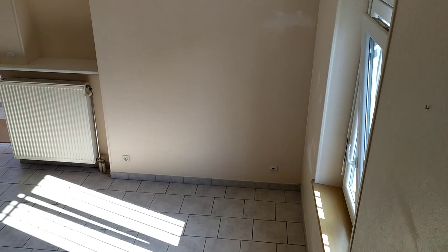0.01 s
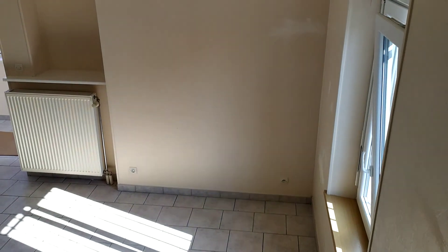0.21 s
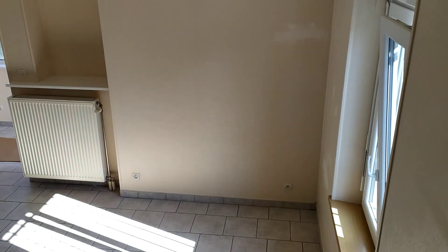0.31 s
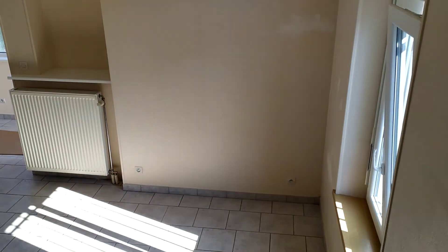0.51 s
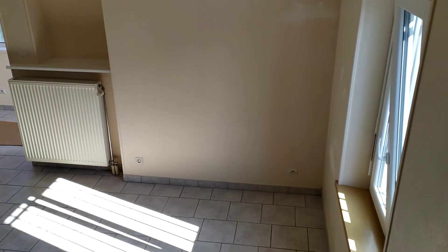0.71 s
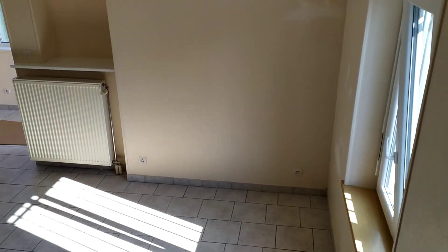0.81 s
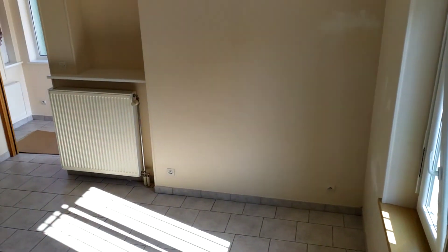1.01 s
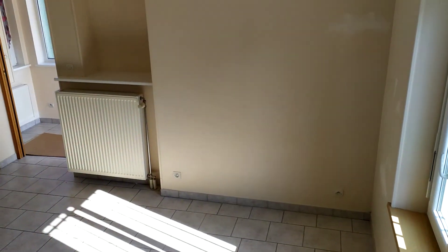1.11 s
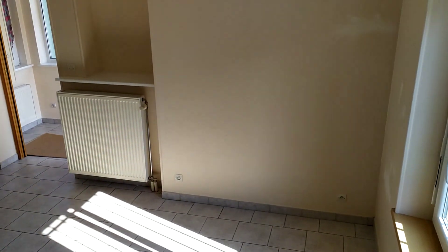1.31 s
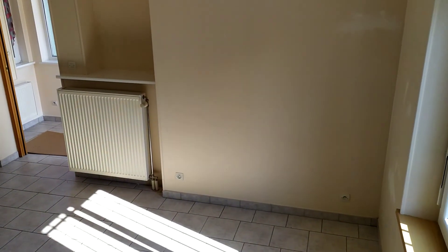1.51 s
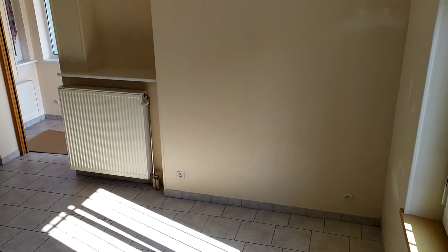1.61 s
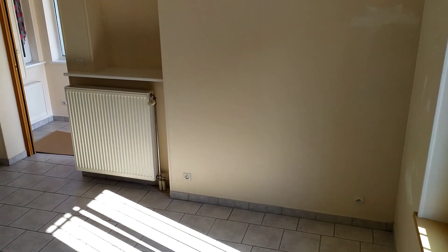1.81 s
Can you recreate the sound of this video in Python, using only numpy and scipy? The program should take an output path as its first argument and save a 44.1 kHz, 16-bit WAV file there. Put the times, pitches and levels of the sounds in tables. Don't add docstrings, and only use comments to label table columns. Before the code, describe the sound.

Hard-soled footsteps walk slowly over tiles in an empty, echoing house, heel crack then sole slap

```python
import sys
import numpy as np
from scipy import signal
from scipy.io import wavfile

SR = 44100
rng = np.random.default_rng(int(sys.argv[2]) if len(sys.argv) > 2 else 0)


def voltage_ratio(decibels):
    exponent = np.asarray(decibels, float) / 20
    return 10 ** exponent


def waveform_to_disk(signal):
    frames = np.transpose(np.atleast_2d(signal))
    scaled = np.clip(frames, -1, 1) * 32767
    samples = np.round(scaled).astype(np.int16)
    wavfile.write(sys.argv[1], SR, samples)


N = 83790
EDGES_HZ = 28 * 2 ** np.arange(0, 9.3, .4)
CENTRES_HZ = np.sqrt(EDGES_HZ[1:] * EDGES_HZ[:-1])


def rms_one(x):
    return x / np.sqrt(np.mean(x ** 2) + 1e-20)


def at_hz(points, hz):
    points_hz, values = np.transpose(points)
    return np.interp(np.log(hz), np.log(points_hz), values)


def drift(rate_hz):
    pole = np.exp(-2 * np.pi * rate_hz * 40 / SR)
    white = rng.standard_normal(N // 40 + 2002)
    slow = signal.lfilter([1], [1, -2 * pole, pole * pole], white)[2000:]
    return np.interp(np.arange(N) / 40, np.arange(len(slow)), rms_one(slow))


def band_filter(low_hz, high_hz, x):
    return signal.sosfilt(signal.butter(2, [low_hz, high_hz], "band", fs=SR, output="sos"), x)


# freq_hz, likeness [-1..1]
LIKENESS = [(60, 1), (250, .9), (500, 0.84), (1000, 0.027), (2000, 0.017), (8000, 0.018)]
# freq_hz, left_over_right_db
LEAN = [(60, 1), (250, 0.4), (1000, -1.5), (2000, -4), (4000, -1.4), (12000, 1.7)]


def noise_bands():
    white, bands = rng.standard_normal((2, 2, N)), []
    for k, hz in enumerate(CENTRES_HZ):
        mid, side = band_filter(EDGES_HZ[k], EDGES_HZ[k + 1], white[k % 2])
        alike = np.clip(at_hz(LIKENESS, hz), -1, 1)
        lean_db = at_hz(LEAN, hz) / 2
        stereo = np.sqrt(1 + alike) * mid + np.sqrt(1 - alike) * side * [[1], [-1]]
        bands.append(stereo * voltage_ratio([[lean_db], [-lean_db]]))
    return np.array(bands)


def steady(spectrum, patchy_db, low_hz):
    gains = [voltage_ratio(at_hz(spectrum, hz) + patchy_db * drift(2.7)) * (hz > low_hz) for hz in CENTRES_HZ]
    return rms_one(np.einsum("bcn,bn->cn", noise_bands(), np.array(gains)))


# freq_hz, density_db_per_hz
HOUSE_COLOUR = [(15, -44), (25, -18.5), (82, -3.5), (134, -25), (205, -16), (421, -20.5), (958, -20),
                (1190, -19.5), (3000, -36), (3900, -58), (6600, -120)]


def house_rumble():
    return voltage_ratio(-55) * steady(list(HOUSE_COLOUR) + [(5000, -45)], patchy_db=-1.0, low_hz=25)


# time_s, level_db
HISS = [(0, -57), (.2, -55), (.3, -60.5), (.5, -61), (.7, -56.5), (.95, -61), (1.1, -60.5), (1.22, -69),
        (1.27, -58), (1.341, -63), (1.55, -64), (1.7, -61.5), (1.76, -55.5), (1.8, -58.5), (1.85, -60.5),
        (1.9, -59)]
# freq_hz, density_db_per_hz
HISS_COLOUR = [(880, -42), (1500, -12), (2000, 1), (3760, 0.5), (4160, -3.5), (9440, 1), (15100, 1),
               (16400, -18)]


def cloth_hiss():
    level_db = np.interp(np.arange(N) / SR, *np.transpose(HISS)) + 4.5
    return voltage_ratio(level_db) * steady(HISS_COLOUR, patchy_db=-0.04, low_hz=2000)


# freq_hz, t60_s
ROOM_T60 = [(60, 0.6), (200, 0.61), (500, 0.73), (1000, 1), (2000, 1), (4000, 0.96), (8000, 0.68),
            (14000, 0.7)]
# freq_hz, gain_db
ROOM_COLOUR = [(50, -8), (120, 4.1), (250, -1.6), (500, -3), (1300, 2.36), (2400, -0.85), (3300, -2),
               (10000, 1.5)]


def room_answers(count):
    early_db, early_t60_s, late_db, build_s = -30.5, 0.18, -36.5, 0.0023
    bands, t = noise_bands(), np.arange(N // 2) / SR
    late = voltage_ratio(late_db - 60 * t / at_hz(ROOM_T60, CENTRES_HZ)[:, None])
    early = voltage_ratio(early_db - 60 * t / early_t60_s)
    shape = np.hypot(late, early) * (1 - np.exp(-t / build_s))
    shape = shape * voltage_ratio(at_hz(ROOM_COLOUR, CENTRES_HZ))[:, None]
    starts = np.arange(count) * (len(t) // count)
    return [np.einsum("bcn,bn->cn", bands[:, :, k:k + len(t)], shape) for k in starts]


def squeak():
    start_s, length_s, level_db, pitch_hz = 1.777, .011, -53, 7330
    t = np.arange(N) / SR
    swell = np.sin(np.pi * np.clip((t - start_s) / length_s, 0, 1))
    return voltage_ratio(level_db) * swell * np.sin(2 * np.pi * pitch_hz * t)


def burst(start_s, level_db, length_s, spectrum):
    t, start, short = np.arange(SR // 16) / SR, int(start_s * SR), 0
    for low_hz, high_hz, hz in zip(EDGES_HZ[6:], EDGES_HZ[7:], CENTRES_HZ[6:]):
        white = rng.standard_normal((2, len(t))) * np.exp(-t / length_s) + 1e-18
        mid, side = map(rms_one, band_filter(low_hz, high_hz, white))
        alike = np.clip(at_hz(LIKENESS, hz) + 0.033, -1, 1)
        stereo = np.sqrt(1 + alike) * mid + np.sqrt(1 - alike) * side * [[1], [-1]]
        short = short + voltage_ratio(at_hz(spectrum, hz)) * np.sqrt(hz) * stereo
    out = np.zeros((2, N + len(t)))
    out[:, start:start + len(t)] = voltage_ratio(level_db) * rms_one(short) * np.sqrt(length_s * 16) / 2
    return out[:, :N]


def contact(start_s, level_db, length_s, spectrum):
    front_s = .0005
    front = burst(start_s, level_db, front_s, spectrum) * np.sqrt(length_s / front_s)
    return burst(start_s, level_db, length_s, spectrum), front


def ring(start_s, pitch_hz, level_db, t60_s, rise_s):
    t = np.maximum(np.arange(N) / SR - start_s, 0)
    return voltage_ratio(level_db - 60 * t / t60_s) * (1 - np.exp(-t / rise_s)) * np.sin(2 * np.pi * pitch_hz * t)


# freq_hz, density_db_per_hz
TICK_COLOUR = [(590, -35), (1000, -19.5), (4310, -4), (6630, -12), (9720, 0.5), (15300, -38), (16000, -20)]


def tick(start_s, level_db, length_s):
    bright, front = contact(start_s, level_db, length_s, TICK_COLOUR)
    return bright, front, 0, -1


# freq_hz, density_db_per_hz
SLAP_COLOURS = [
    [(180, -7), (300, 0), (1920, -36.5), (5010, -57), (6000, -66), (6250, -50.5), (8000, -34), (10400, -64),
     (17600, -120)],
    [(180, -22), (300, -2.5), (1280, -15.5), (1610, -22.5), (2250, -17), (4830, -37.5), (10400, -36),
     (14200, -45), (16000, -78)],
    [(180, 0), (300, 2.5), (584, -7.5), (1410, -4.5), (1840, -13), (2700, -19), (5610, -37.5), (9240, -41),
     (16000, -67)],
]
# pitch_hz, level_under_slap_db
KNOCKS = [
    [(750, -2), (1300, -13)],
    [(490, -5), (750, -3), (1350, -1.5), (2300, -5)],
    [(800, -5.5), (1380, -2), (2500, -2.5)],
]
# pitch_hz, level_db, t60_s
BOOMS = [
    [(51.6, -17, 0.44), (120, -6, .12), (210, 2.5, 0.28), (283, 0.5, 0.17)],
    [(51, -19, 0.44), (106.5, -2.5, 0.1), (125.6, -6.5, 0.097), (199, -3, 0.093), (246, -0.5, .09)],
    [(49.6, -7, 0.51), (116.5, -2.5, 0.097), (242, -4, 0.077), (270.2, 0.5, 0.15), (340, -4, 0.17)],
]


def slap(start_s, slap_db, boom_db, length_s, knock, modes, colour):
    smack, front = contact(start_s, slap_db, length_s, colour)
    knock_lag_s = .00011
    smack = smack - [sum(ring(start_s + lag_s, hz, slap_db + db, .018, 0.00025) for hz, db in knock)
                     for lag_s in (knock_lag_s, 0)]
    (deep_hz, deep_db, deep_t60_s), *upper_modes = modes
    boom = ring(start_s, deep_hz, boom_db + deep_db, deep_t60_s, rise_s=0.11)
    for hz, db, t60_s in upper_modes:
        mode_s = start_s + rng.uniform(0, 1 / hz)
        boom = boom + ring(mode_s, hz, boom_db + db, min(t60_s, .13), rise_s=0.0013)
    return smack, front, boom, -1.5


# freq_hz, density_db_per_hz
HEEL_COLOURS = [
    [(530, 11), (900, -5), (1900, 0.5), (4570, -4), (5680, -6.5), (7860, -2.5), (14900, -17.5),
     (16000, -54)],
    [(530, -19), (900, -2.5), (1570, -4), (3680, -5.5), (4570, -2), (4980, -19), (7310, -4.5),
     (16000, -26.5)],
]
# pitch_hz, level_under_crack_db, t60_s
HEEL_TIPS = [
    (4480, -6, .012),
    (3710, -2, .012),
]


def heel(start_s, crack_db, ring_db, pitch_hz, pan_db, shoe):
    tip_hz, tip_db, tip_t60_s = HEEL_TIPS[shoe]
    crack, front = contact(start_s, crack_db, .0025, HEEL_COLOURS[shoe])
    ping = ring(start_s, tip_hz, crack_db + tip_db, tip_t60_s, rise_s=0.00058)
    hollow = sum(ring(start_s + .002, pitch_hz * ratio, ring_db + db, t60_s=.11, rise_s=0.00068)
                 for ratio, db in [(1, 0), (1.4, -12)])
    return crack + ping, front, hollow, pan_db


# start_s, crack_db, ring_db, pitch_hz, left_over_right_db
HEELS = [
    (.2155, -19, -15.5, 193, -4.5),
    (1.0300, -17.5, -22.5, 186.4, -5.5),
    (1.8965, -23, -19.5, 205, -8),
]
# start_s, level_db, length_s
TICKS = [
    (.5868, -28, .0007),
    (1.045, -34, .0015),
    (1.745, -50, .006),
]
# start_s, slap_db, boom_db, length_s
SLAPS = [
    (.002, -27.5, -28.5, 0.0069),
    (.2590, -8, -10.5, 0.0052),
    (1.0645, -11, -17.5, 0.0081),
]
SPOT_WET_DB = [-0.1, -0.1, 1, -1.5, -1.5, -1, -0.5, -0.17, 0]


def scene():
    hits = [heel(*row, shoe=k % 2) for k, row in enumerate(HEELS)]
    hits += [tick(*row) for row in TICKS]
    hits += [slap(*row, KNOCKS[k], BOOMS[k], SLAP_COLOURS[k]) for k, row in enumerate(SLAPS)]
    out = house_rumble() + cloth_hiss() + squeak()
    for (bright, front, low, pan_db), echo, wet_db in zip(hits, room_answers(len(hits)), SPOT_WET_DB):
        into_room = front + voltage_ratio(-3) * low
        wet = voltage_ratio(wet_db) * signal.fftconvolve(into_room, echo, axes=1)[:, :N]
        direct = bright * voltage_ratio([[pan_db / 2], [-pan_db / 2]]) + low * voltage_ratio([[.7], [-.7]])
        out = out + direct + wet
    return out


def low_pass(x):
    return signal.sosfilt(signal.butter(12, 16510, fs=SR, output="sos"), x)


def record(dry):
    presence_hz, presence_width_hz, presence_db = 9620, 2140, -4
    peak = signal.lfilter(*signal.iirpeak(presence_hz, presence_hz / presence_width_hz, fs=SR), dry)
    mic = np.vstack([signal.butter(3, 45.4, "high", fs=SR, output="sos"),
                     signal.butter(1, 12500, fs=SR, output="sos"),
                     signal.cheby2(10, 60, 17200, fs=SR, output="sos")])
    mix = signal.sosfilt(mic, dry + voltage_ratio(presence_db) * peak)
    return low_pass(mix)


dry = scene()
out = record(dry)
waveform_to_disk(out)
```